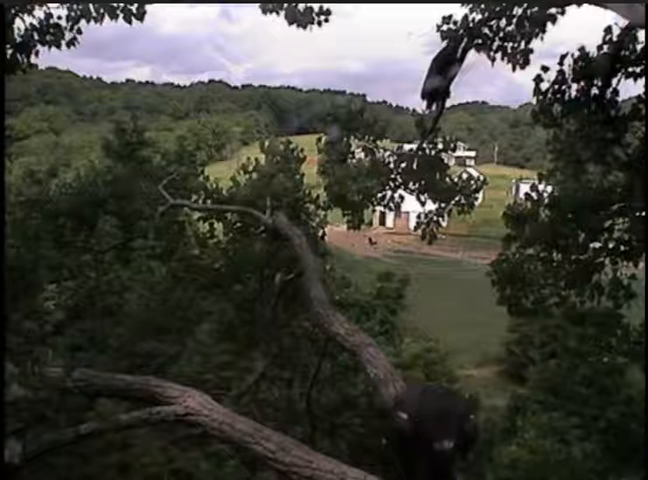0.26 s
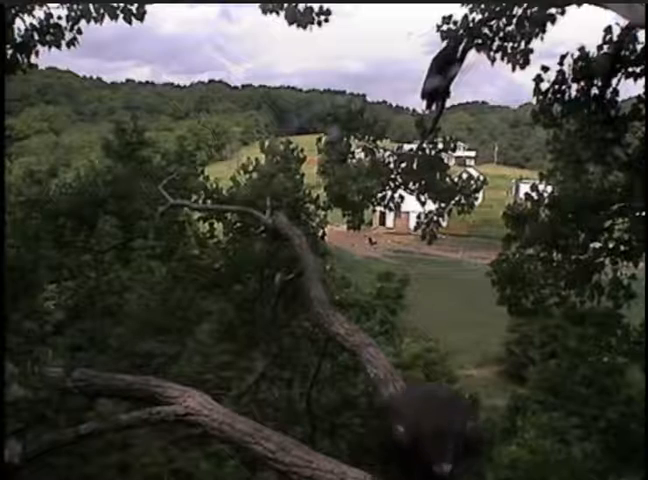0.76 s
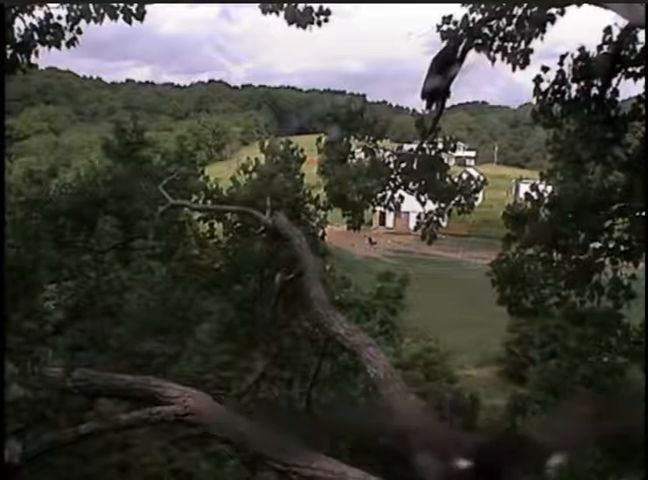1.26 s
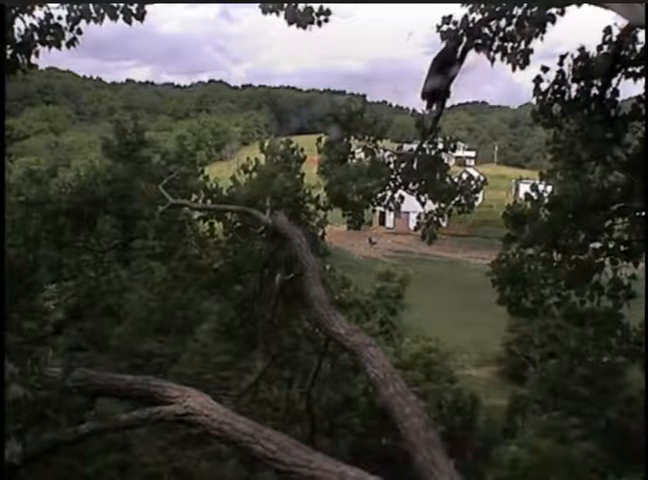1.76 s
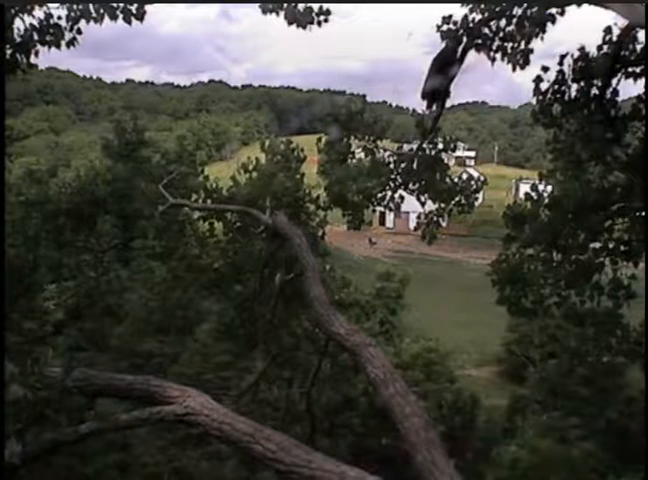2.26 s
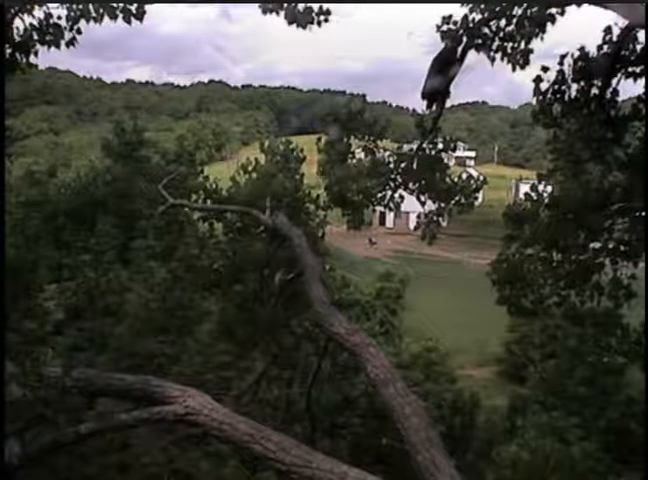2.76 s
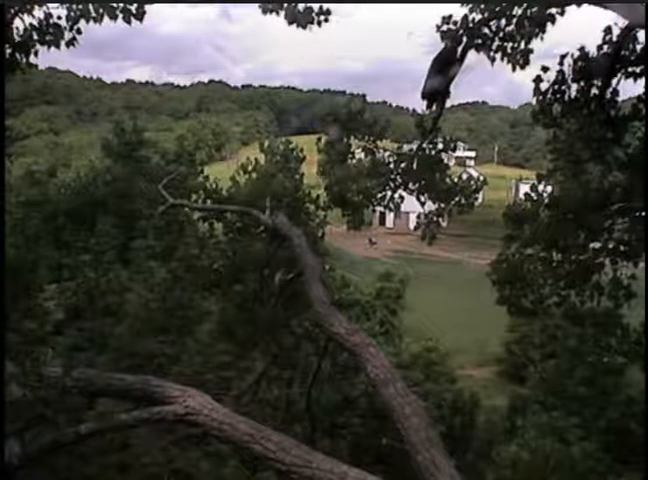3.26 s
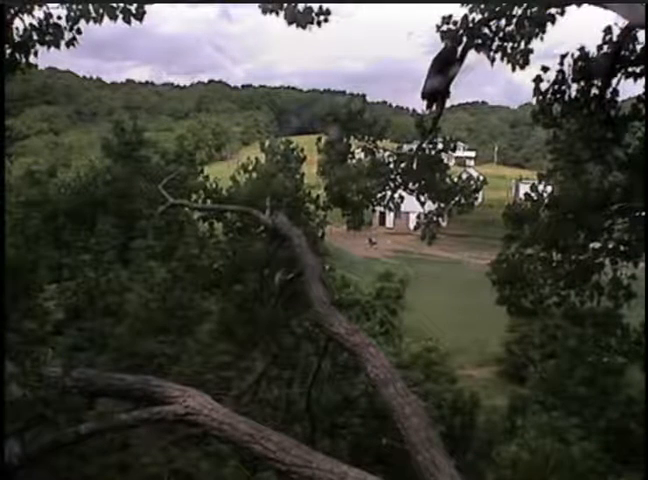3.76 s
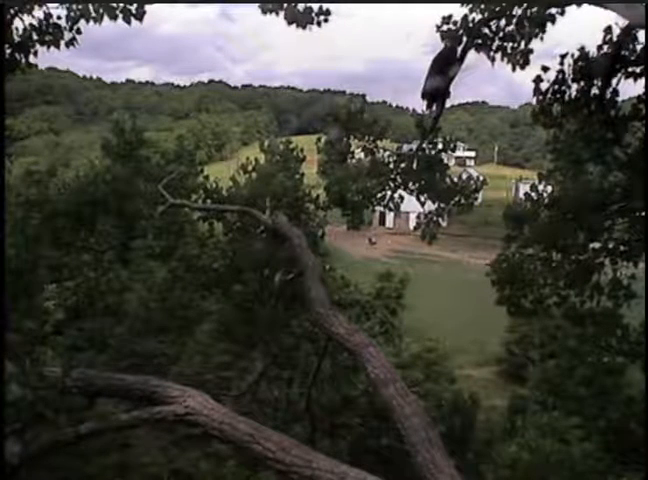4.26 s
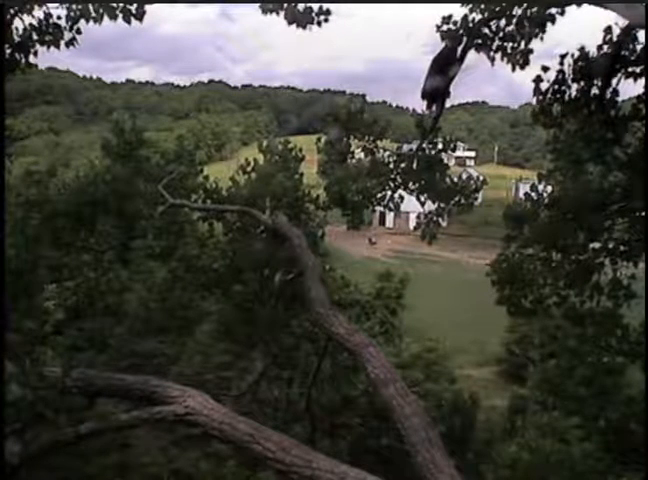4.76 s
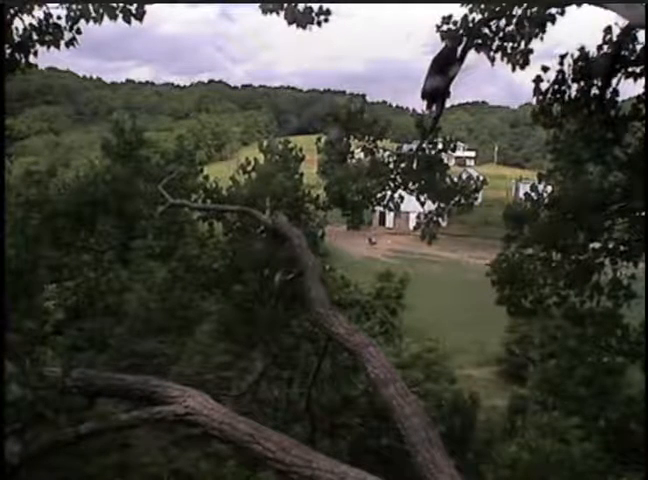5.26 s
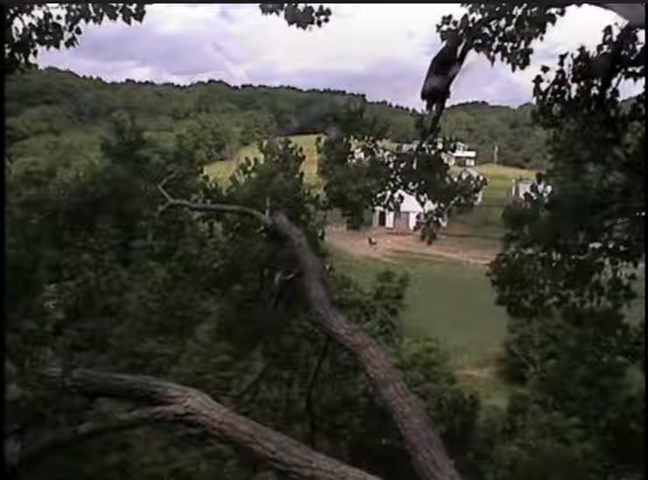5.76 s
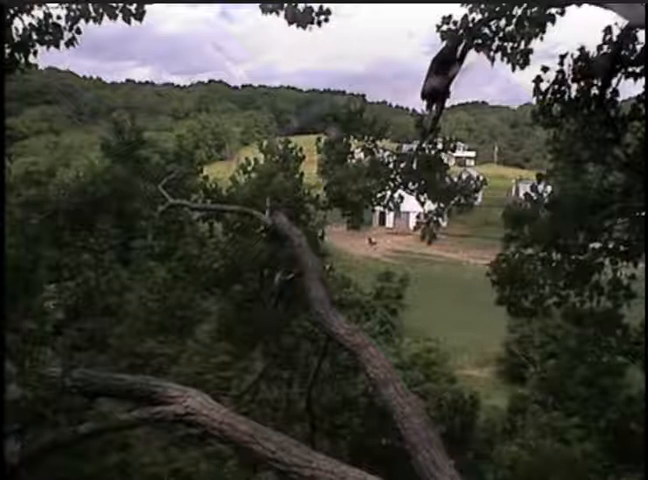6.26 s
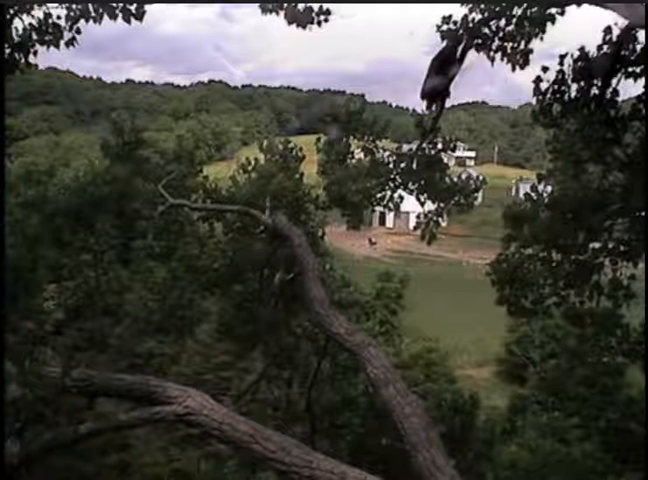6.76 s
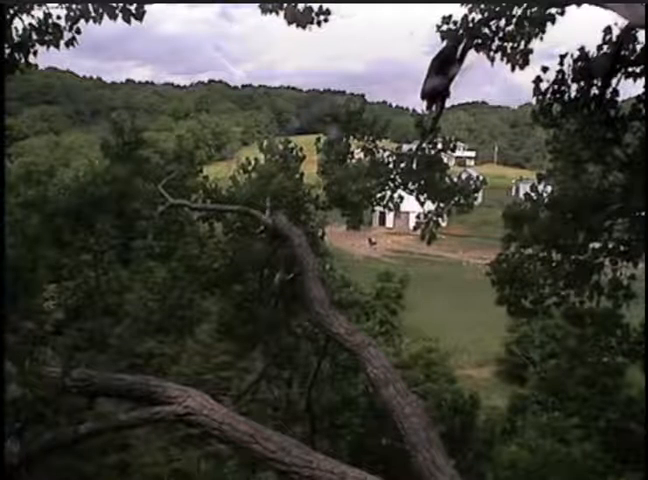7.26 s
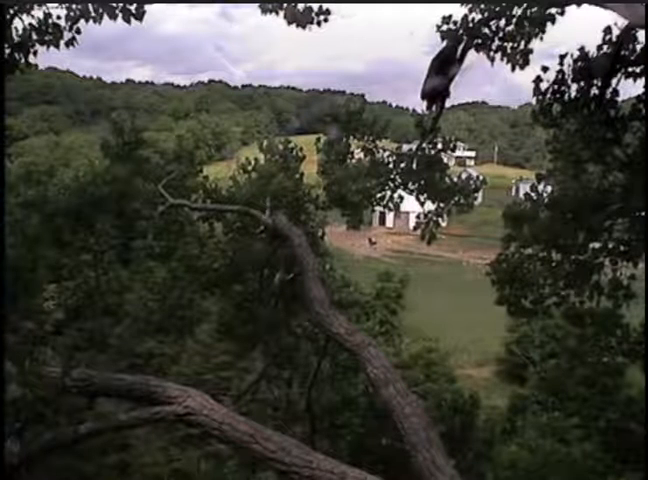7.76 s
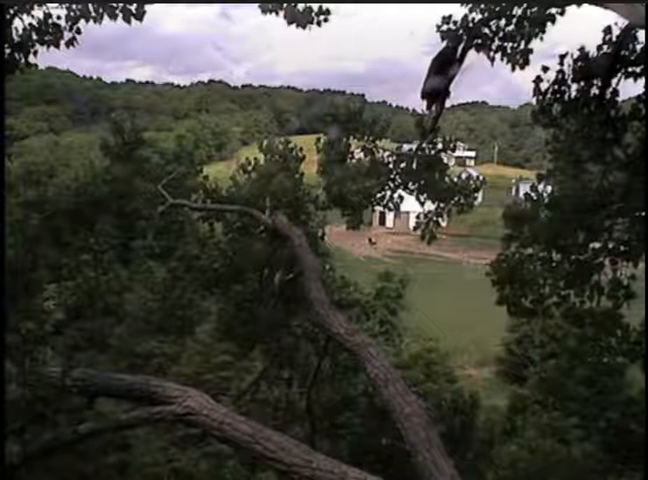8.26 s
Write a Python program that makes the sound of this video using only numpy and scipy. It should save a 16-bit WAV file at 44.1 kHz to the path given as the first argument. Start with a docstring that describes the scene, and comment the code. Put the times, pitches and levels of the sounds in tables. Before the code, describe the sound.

A large bird of prey close by gives four piercing, wavering whistled calls over a low distant engine hum, then only the hum remains.

```python
"""Eagle calling in a tree

An eagle whistles four long calls close to a small camera fixed in the tree; both sides of its syrinx
(the bird's voice box) sing at once, as wavering tones with rasping noise. Short noises make its wings
thump and small birds call far off; a distant engine hums as tones over a valley of filtered noise.
The camera's limiter ducks the hum under the calls; coarse sampling mirrors each whistle into the treble."""
import sys
import numpy as np
from scipy import signal
from scipy.fft import rfft, irfft, next_fast_len
from scipy.io import wavfile
from scipy.ndimage import uniform_filter1d

SR = 44100
rng = np.random.default_rng(int(sys.argv[2]) if len(sys.argv) > 2 else 0)


def to_wav(sig):
    """Store sig (one row per channel, or 1-D mono) as 16-bit WAV at the path in sys.argv[1].

    Samples outside -1..1 are clipped; the rate is SR.
    """
    pcm = np.clip(np.atleast_2d(sig), -1, 1) * 32767
    pcm = np.round(pcm).astype(np.int16)
    wavfile.write(sys.argv[1], SR, pcm.T)  # frames by channels


N = 375291
TIME = np.arange(N) / SR

# distant engine before smoothing and trims: (t/s, firing rate f/Hz, level/dB of harmonics 1, 2 and 3)
ENGINE_COURSE = [(0, 102, -79, -33.5, -34), (.5, 99.5, -58, -39.5, -37.5), (1.38, 100.7, -54, -49, -35.5),
                 (1.55, 100.3, -52, -39, -24.5), (2.1, 101.8, -56, -38.5, -41.5),
                 (2.58, 100.7, -70, -43.5, -34), (2.78, 102.7, -66, -66, -25), (3.02, 103, -68, -54, -33.5),
                 (3.3, 103.5, -55, -36, -22), (3.6, 100.5, -61, -46, -46), (4.3, 102.9, -54, -38, -27),
                 (4.7, 103.6, -52.5, -45.5, -26.5), (4.88, 102.5, -52, -32, -39.5),
                 (5.25, 101.7, -61, -44, -26.5), (5.85, 102, -55.5, -47, -38), (6.5, 100.4, -50, -54, -24),
                 (7.05, 100.3, -53.5, -42, -38), (7.68, 96.95, -70, -46.5, -28),
                 (7.9, 99.5, -66, -35.5, -32.5), (8.5, 98.6, -59, -38, -29)]
# steady tones of the far hum: (f/Hz, level/dB)
HUM_TONES = [(135, -56), (165.5, -50.5), (409, -53.5)]
# spectrum shape of the valley's roar: (f/Hz, relative level/dB)
VALLEY_SPECTRUM = [(18, -86.5), (30, -53), (64, -57), (77, -59), (87, -49), (133, -34.5), (194, -15.5),
                   (260, -8), (298, -5), (372, -2.5), (406, -2), (612, -6), (739, -12.5), (1060, -30.5),
                   (1800, -52.5), (2340, -82.5), (3960, -120)]
# spectrum shape of leaves and insects: (f/Hz, relative level/dB)
LEAF_SPECTRUM = [(1000, -5), (1900, -5.5), (2500, 3.5), (3400, 5), (4800, 5.5), (5500, 0.5), (6500, 4),
                 (7500, -0.5)]
# wing strokes: (t/s, bell width/s, thump f/Hz, thump level/dB, feather level/dB), before the low cut
WING_STROKES = [(0.312, 0.012, 453, -18.5, -70), (1.204, 0.0069, 380, -25, -55),
                (1.28, 0.0072, 380, -20, -50), (1.618, 0.012, 620, -20, -24),
                (1.645, 0.0032, 593, -11, -22), (1.662, 0.021, 457, -37, -31.5),
                (1.717, .012, 492, -20, -42)]
# spectrum shape of brushing feathers: (f/Hz, relative level/dB)
FEATHER_SPECTRUM = [(300, -5), (1000, -18), (1700, -8), (2700, 2), (3700, 10), (5000, 3), (7500, 3.5)]
# the four calls: (start t/s, end t/s, opening scoop f/Hz, closing fall f/Hz, quaver depth f/Hz,
# second side's own pitch f/Hz, octave's relative level/dB at start, at end, extra rasp level/dB)
CALLS = [(0.572, 1.459, -0.5, 241.4, 20, 1010, -0.5, -6.5, -0.5),
         (1.766, 2.749, 720.5, 863.5, 27.2, 880, -18, -24, -1),
         (2.738, 3.886, 0.5, 917, 11, 710, -17, -15, -1), (4.258, 4.964, 54, 400, 7, 750, -19, -6, -2)]
# course of each call, before scoop, fall and the eagle's final gain: (t/s, pitch f/Hz, level/dB)
THIN_COURSE = [(.57, 3410, -51), (.76, 3300, -42.5), (.86, 3550, -46.5), (1.02, 3572, -29.5),
               (1.16, 3516, -25), (1.279, 3620, -26), (1.283, 3177, -20.5), (1.335, 3163, -28),
               (1.36, 3250, -8.5), (1.46, 3250, -21)]
# same columns: (t/s, pitch f/Hz, level/dB)
LOUD_COURSE = [(1.771, 4238, -20), (1.86, 4213, -16.5), (1.94, 4299, -12.5), (2.03, 4040, -11.5),
               (2.35, 4073, -12.5), (2.54, 3810, -12.5), (2.668, 4020, -11.5), (2.75, 4010, -11)]
# same columns: (t/s, pitch f/Hz, level/dB)
RISING_COURSE = [(2.759, 3270, -34), (3.0, 3225, -34), (3.045, 3320, -15), (3.13, 3436, -20),
                 (3.21, 3619, -18), (3.55, 3938, -15), (3.586, 4186, -14), (3.63, 4007, -5),
                 (3.696, 4007, -8.5), (3.749, 4145, -17), (3.89, 3976, -8)]
# same columns: (t/s, pitch f/Hz, level/dB)
LAST_COURSE = [(4.26, 3344, -39), (4.3, 3376, -25), (4.407, 3457, -29), (4.425, 3600, -26.5),
               (4.47, 3580, -22.5), (4.5, 3465, -31.5), (4.559, 3434, -21.5), (4.86, 3488, -31.5),
               (4.965, 3420, -24.5)]
CALL_COURSES = [THIN_COURSE, LOUD_COURSE, RISING_COURSE, LAST_COURSE]
# when the second side sings: (start t/s, end t/s, level/dB at start, middle and end), before the final gain
SECOND_STRETCHES = [(.82, .99, -51, -28.5, -40), (0.988, 1.148, -42, -36.5, -35),
                    (1.747, 1.832, -35.5, -23, -35), (1.83, 2.033, -23, -21.5, -35),
                    (2.03, 2.758, -33, -41, -22), (3.25, 3.893, -39.5, -33, -30.5),
                    (4.407, 4.962, -42.5, -33.5, -26.5)]
# harsh moments, when the bird forces the air: (t/s, bell width/s, extra rasp level/dB)
FORCED_MOMENTS = [(1.331, 0.032, 10.5), (1.434, 0.015, 8.5), (1.95, 0.043, 3), (2.404, 0.061, 4),
                  (2.718, 0.031, 6.5), (3.16, 0.0597, 2.5), (3.706, 0.093, 3), (4.898, .06, 3.5)]
# spectrum shape of turbulent air in the throat: (f/Hz, relative level/dB)
RASP_SPECTRUM = [(50, -44), (200, -16), (1400, -40), (2200, -10), (3000, 2.5), (4400, 10), (5400, 9.5),
                 (6500, 5), (7300, 17), (8000, 9.5)]
# moans under the whistle: (t/s, length/s, base f/Hz, added arch f/Hz, level/dB), before the final gain
LOW_MOANS = [(2.12, .2, 160, 50, -33), (2.42, 0.18, 270, 388, -29.5), (3.23, .17, 159.7, 50, -38.5),
             (3.72, .12, 170.4, 50, -33)]
# stray tones beside the whistle: (t/s, length/s, start f/Hz, end f/Hz, level/dB)
STRAY_GLIDES = [(0.662, 0.1, 2880, 2810, -47), (0.864, .1, 3700, 3840, -38),
                (1.293, 0.026, 3790, 3730, -23), (1.324, 0.025, 3870, 3710, -19),
                (1.431, 0.027, 2890, 2375, -23), (1.895, 0.078, 3215, 2960, -30.5),
                (2.658, 0.062, 3644, 3500, -21), (2.775, 0.22, 3340, 3690, -35),
                (2.963, 0.0682, 3514, 3725, -25), (3.089, .15, 2707, 2980, -37.5),
                (3.156, 0.082, 3490, 3450, -19), (3.234, 0.02, 2950, 2300, -28.5),
                (3.72, .12, 3560, 3906, -28.5), (3.72, 0.13, 4650, 4393, -32.5)]
# short rising low notes: (t/s, length/s, start f/Hz, end f/Hz, level/dB, octave's relative level/dB)
SQUEAK_NOTES = [(2.325, 0.12, 1024, 1192, -32, -7), (3.008, 0.045, 1160, 1319, -34.5, -4),
                (4.191, 0.045, 1136, 1287, -35.5, -4)]
# small birds far off: (t/s, bell width/s, pitch f/Hz, level/dB)
FAR_CHIRPS = [(5.587, .04, 6630, -45), (5.641, 0.035, 6240, -46), (5.699, 0.029, 4625, -43.5),
              (6.566, 0.072, 3470, -55), (7.165, 0.034, 3210, -51), (7.31, 0.046, 2568, -55),
              (7.703, 0.044, 2840, -50), (7.782, 0.083, 2500, -52), (7.997, 0.044, 3500, -53),
              (8.416, 0.06, 3070, -49.5)]

ATTACK_S, RELEASE_S = 0.0035, 0.038
SCOOP_S, FALL_S = 0.09, 0.062  # the pitch slides up into a call and drops as the air runs out
# the second side starts sooner, slides slower and takes a share of the lead's pitch
SECOND_EARLY_S, SECOND_SCOOP_S, SECOND_FOLLOW = 0.02, 0.14, 0.62
QUAVER_UNTIL = 0.696  # share of a call after which the pitch steadies
RASP_SLOPE, FULL_DB, FULL_RASP_DB = 0.67, -13, -33.5  # base rasp grows with the level; its value at full voice
CAMERA_SR, STORE_SR, TOP_HZ = 16000, 22050, 15800


def undb(db):
    """Turn decibels into a gain."""
    return 10 ** (np.asarray(db) / 20)


def curves(table):
    """Draw each column of a table as a curve over time."""
    s, *columns = np.transpose(table)
    return [np.interp(TIME, s, column) for column in columns]


def noise(gain):
    """Noise of rms 1 whose spectrum follows gain(Hz)."""
    size = next_fast_len(N + N % 2, real=True)
    spectrum = rfft(rng.standard_normal(size))
    shape = gain(np.fft.rfftfreq(size, 1 / SR) + 1e-3)
    x = irfft(spectrum * shape, size)[:N]
    return x / x.std()


def coloured(points):
    """Noise with a spectrum drawn through (Hz, dB) points, fading out above the last."""
    hz, db = np.transpose(points)

    def gain(f):
        return undb(np.interp(np.log(f), np.log(hz), db)) / (1 + (f / hz[-1] / 2) ** 4)
    return noise(gain)


def band(hz, width_hz):
    """Noise in one steep resonance; centred on zero it is a slow random wander."""
    return noise(lambda f: 1 / (1 + ((f - hz) / width_hz) ** 2) ** 2)


def turn(hz):
    """Phase of an oscillator with this pitch curve."""
    return 2 * np.pi * np.cumsum(hz) / SR


def tone(phase):
    """Sine of rms 1."""
    return np.sqrt(2) * np.sin(phase)


def swell(s, width_s):
    """Bell-shaped loudness curve."""
    return np.exp(-0.5 * ((TIME - s) / width_s) ** 2)


def ramp(s, length_s):
    """Rise from 0 to 1 over length_s from time s."""
    return np.clip((TIME - s) / length_s, 0, 1)


def gate(start, end):
    """Quick attack, hold and release of a note."""
    return ramp(start, ATTACK_S) * np.clip((end - TIME) / RELEASE_S, 0, 1)


def engine(first_trim_db=-1, second_trim_db=-2, third_trim_db=-1):
    """A far engine's harmonics fade in and out on the way across the valley, beside steady humming tones."""
    hz, first_db, second_db, third_db = curves(ENGINE_COURSE)
    steady_hz = uniform_filter1d(hz, size=SR // 3)  # a slow average keeps the hum's pitch steady
    firing = turn(steady_hz + 0.8 * band(0, 13.7))
    out = undb(first_db + first_trim_db) * tone(firing)
    out += undb(second_db + second_trim_db) * tone(2 * firing)
    out += undb(third_db + third_trim_db) * tone(3 * firing)
    for hum_hz, db in HUM_TONES:
        out += undb(db + 2 * band(0, 1.5)) * tone(turn(hum_hz + 1.5 * band(0, 5)))
    return out


def valley(roar_db=-26.12, leaves_db=-46.5):
    """The distance gives a low roar of filtered noise; leaves add a thin hiss."""
    roar = undb(roar_db + 0.44 * band(0, 3.2)) * coloured(VALLEY_SPECTRUM)
    hiss = undb(leaves_db + 1.0 * band(0, 15)) * coloured(LEAF_SPECTRUM)
    return roar + hiss


def wings():
    """Each stroke shoves air with a dull thump while the feathers brush."""
    rustle = coloured(FEATHER_SPECTRUM)
    strokes = np.zeros(N)
    for s, width, hz, thump_db, rustle_db in WING_STROKES:
        thump = undb(thump_db) * band(hz, 250)
        strokes += swell(s, width) * (thump + undb(rustle_db) * rustle)
    low_cut = signal.butter(4, 190, "high", fs=SR, output="sos")
    return signal.sosfilt(low_cut, strokes)


def syrinx():
    """Controls of the calls: both pitches, level, octave share, quaver depth, extra rasp and the air's gate."""
    controls = np.zeros((7, N))
    for call, course in zip(CALLS, CALL_COURSES):
        start, end, scoop_hz, fall_hz, quaver_hz, own_hz, first_db, last_db, extra_db = call
        hz, db = curves(course)
        along = ramp(start, end - start)
        fall = fall_hz * ramp(end - FALL_S, FALL_S) ** 2
        lead_hz = hz - fall - scoop_hz * (1 - ramp(start, SCOOP_S)) ** 2
        second_scoop = scoop_hz * (1 - ramp(start, SECOND_SCOOP_S)) ** 2
        second_hz = own_hz + SECOND_FOLLOW * hz - fall - second_scoop
        octave_db = first_db + (last_db - first_db) * along
        quaver = quaver_hz / (1 + (along / QUAVER_UNTIL) ** 8)
        now = [lead_hz, second_hz, db, octave_db, quaver, np.full(N, extra_db), gate(start, end)]
        # a new call takes over only where the last one's air is shut off
        takes_over = (TIME >= start - SECOND_EARLY_S) & (controls[-1] == 0)
        controls = np.where(takes_over, now, controls)
    return controls


def second_level():
    """Level of the second side in dB: it sounds in stretches, some running straight into the next."""
    gain = np.zeros(N)
    for start, end, *db in SECOND_STRETCHES:
        level = np.interp(TIME, np.linspace(start, end, len(db)), db)
        gain += gate(start, end) * undb(level)
    return 20 * np.log10(gain + 1e-6)


def eagle(flutter=0.084, skirt_db=-1, coupling_db=-16, rasp_db=7.5, second_octave_db=-28, shimmer_db=2.96,
          forced_quaver_hz=2, sum_tone_db=-17, calm_bursts=0.55, forced_octave=1.0, ragged=0.29,
          forced_jitter_hz=7):
    """Two coupled membranes whistle; the harder the air is forced, the more they rasp."""
    hz, second_hz, held_db, octave_db, quaver_hz, hoarse_db, flow = syrinx()
    gate_db = 20 * np.log10(flow + 1e-6)
    forced = sum(extra_db * swell(s, width) for s, width, extra_db in FORCED_MOMENTS)
    # a forced voice breaks up
    db = held_db + gate_db + shimmer_db * band(0, 26.7) + ragged * forced * band(0, 98)
    air_db = FULL_RASP_DB + RASP_SLOPE * (held_db - FULL_DB) + hoarse_db + forced + gate_db
    second_db = second_level()
    strain = np.clip((air_db + 42) / 11, 0, 1)  # 0 calm, 1 harsh

    quaver = (quaver_hz + forced_quaver_hz * forced) * band(34, 20)
    stumble = forced_jitter_hz * forced * band(0, 118)
    lead = turn(hz + quaver + stumble + (5 + 11 * strain) * band(0, 300))
    second = turn(second_hz + 0.5 * quaver + (10 + 20 * strain ** 2) * band(0, 300))

    # the octave is strong only while it lies below about 7.1 kHz, and fades out as it climbs higher
    octave = undb(octave_db + forced_octave * forced) * np.clip((3750 - hz) / 200, 0.06, 1)
    smear = (0.56 + 0.28 * strain) * band(0, 670)
    lead_tones = tone(lead) + octave * tone(2 * lead + smear)
    voice = undb(db) * (1 + flutter * band(0, 230)) * lead_tones
    second_tones = tone(second) + undb(second_octave_db) * tone(2 * second)
    voice += undb(second_db + (1.17 + 2.0 * strain) * band(0, 60)) * second_tones

    # each side shakes the other: side tones appear one beat away and at the sum of both pitches
    beat_tone = undb(coupling_db) * tone(2 * lead - second)
    sum_tone = undb(sum_tone_db) * tone(lead + second)
    voice += undb(np.minimum(second_db, db)) * (beat_tone + sum_tone)

    # turbulence jostles the membrane and spreads a noisy skirt round its pitch
    jostle = band(0, 720) * tone(lead) + band(0, 720) * tone(lead + np.pi / 2)
    bursts = (calm_bursts + (1 - calm_bursts) * strain) * band(0, 200)
    voice += undb(air_db + skirt_db + np.clip(db + 20, -8, 7) + 0.86 * bursts) * jostle
    rasp = undb(air_db + rasp_db + 3.05 * bursts) * coloured(RASP_SPECTRUM)
    return voice + moans(lead) + rasp


def stray_tones(waver_hz=38, loud_db=-24, shimmer_db=4.5):
    """Unsteady extra tones of the strained syrinx, each a short glide; the louder ones waver more."""
    waver, shimmer = waver_hz * band(0, 216), shimmer_db * band(0, 75)
    out = np.zeros(N)
    for s, length, start_hz, end_hz, db in STRAY_GLIDES:
        u = ramp(s, length)
        unrest = np.sqrt(min(undb(db - loud_db), 1))
        arch = 2 * np.sqrt(u * (1 - u))
        phase = turn(start_hz + (end_hz - start_hz) * u + unrest * waver)
        out += undb(db + unrest * shimmer) * arch * tone(phase)
    return out


def moans(lead, side_db=0, wide_side_db=-6, waver_hz=25):
    """Low tones that rise and fall; each shakes the whistle and lifts two side tones above it."""
    waver, shimmer = waver_hz * band(0, 150), 2 * band(0, 60)
    out = np.zeros(N)
    for s, length, base_hz, arch_hz, db in LOW_MOANS:
        u = ramp(s, length)
        arch = 2 * np.sqrt(u * (1 - u))
        phase = turn(base_hz + arch_hz * np.sin(np.pi * u) ** 2 + waver)
        tones = tone(phase) + undb(side_db) * tone(lead + phase)
        tones += undb(wide_side_db) * tone(lead + 2 * phase)
        out += undb(db + shimmer) * arch * tones
    return out


def squeaks():
    """Brief low notes that slide up as the syrinx catches."""
    out = np.zeros(N)
    for s, length, start_hz, end_hz, db, octave_db in SQUEAK_NOTES:
        u = ramp(s, length)
        phase = turn(start_hz + (end_hz - start_hz) * u + 15 * band(0, 190))
        tones = tone(phase) + undb(octave_db) * tone(2 * phase)
        out += undb(db) * np.sin(np.pi * u) * tones
    return out


def small_birds():
    """Far calls, smeared by the forest into narrow patches of noise."""
    return sum(undb(db) * swell(s, width) * band(hz, 340) for s, width, hz, db in FAR_CHIRPS)


def forest(x, t60_s=0.65, wet_db=-31):
    """Trunks and leaves scatter a faint tail: noise that builds up, then dies away."""
    t = TIME[:SR]
    tail = rng.standard_normal(SR) * undb(-60 * t / t60_s) * (1 - np.exp(-t / 0.065))
    tail /= np.linalg.norm(tail)
    return x + undb(wet_db) * signal.fftconvolve(x, tail)[:N]


def scene():
    """The near bird in its tree, over the far sounds."""
    near = forest(undb(3.5) * eagle() + stray_tones() + squeaks() + wings())
    return (near + small_birds() + engine() + valley())[None]


def limiter(x, top_db=-11.0, window_s=0.014):
    """Turn everything down while the short-term level is over the top."""
    power = uniform_filter1d(x ** 2, max(int(window_s * SR), 8))
    return x / (1 + (power / undb(top_db) ** 2) ** 4) ** (1 / 8)


def resample(x, ease=0.27):
    """Crude change of rate: nearly straight lines between samples that linger a little at each one."""
    place = np.arange(N // 2 + 1) * CAMERA_SR / STORE_SR
    eased = place - ease * np.sin(2 * np.pi * place) / 10
    return np.interp(eased, np.arange(len(x)), x)


def record(dry):
    """The camera limits, samples coarsely and saturates; resampling leaves mirror tones in the treble."""
    # the filter works at 160 times SR, the rate between the two
    coarse_filter = signal.firwin(6001, 7900, fs=SR * 160)
    coarse = signal.resample_poly(limiter(dry[0]), CAMERA_SR, SR, window=coarse_filter)
    # the overload's third harmonic folds back beside the whistle
    overloaded = 0.41 * np.tanh(coarse / 0.41)
    low_cut = signal.butter(2, 75, "high", fs=CAMERA_SR, output="sos")
    stored = resample(signal.sosfilt(low_cut, overloaded))
    # such a short filter lets mirror tones through
    full = signal.resample_poly(stored, 2, 1, window=signal.firwin(9, 0.5))[:N]
    top_cut = signal.ellip(10, 0.2, 80, TOP_HZ, fs=SR, output="sos")
    return signal.sosfilt(top_cut, full)[None]


dry = scene()
out = record(dry)
to_wav(out)
```